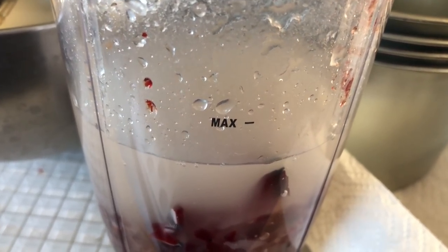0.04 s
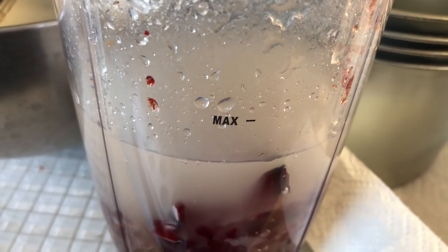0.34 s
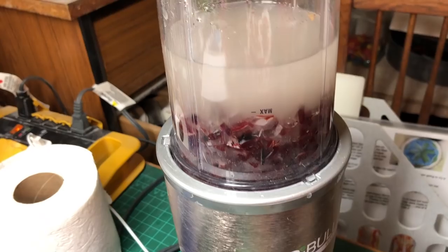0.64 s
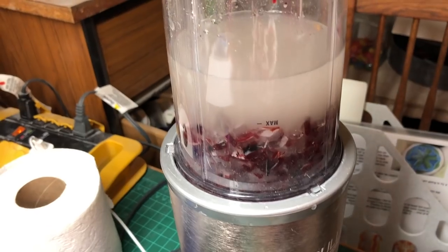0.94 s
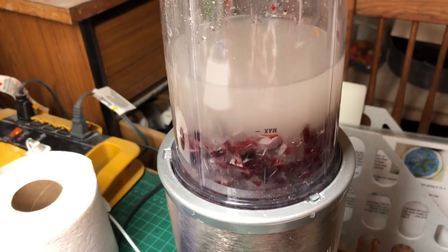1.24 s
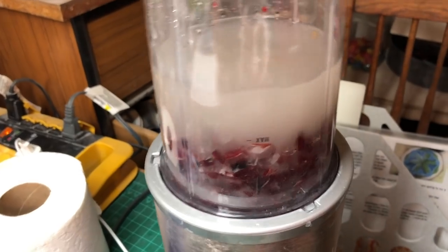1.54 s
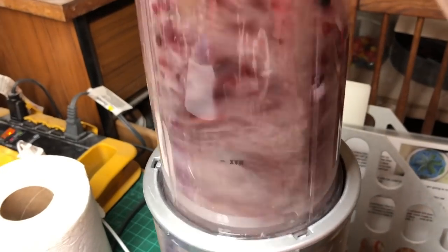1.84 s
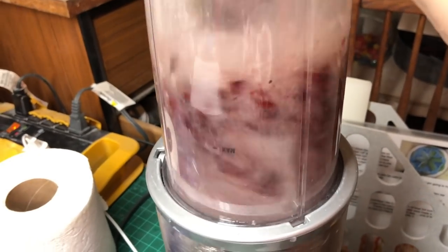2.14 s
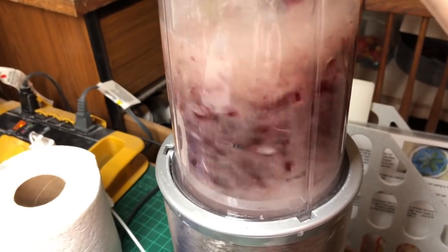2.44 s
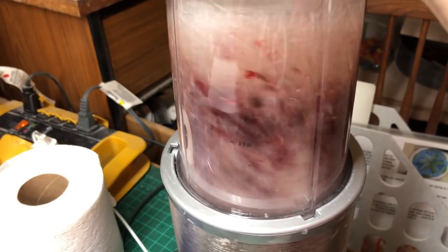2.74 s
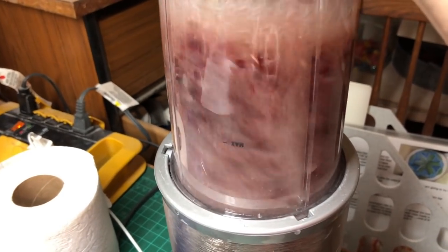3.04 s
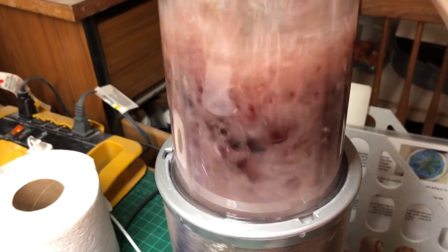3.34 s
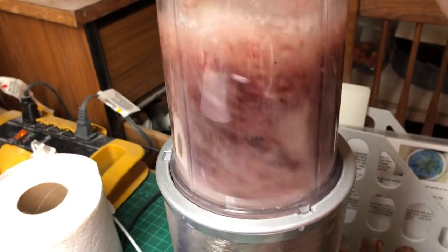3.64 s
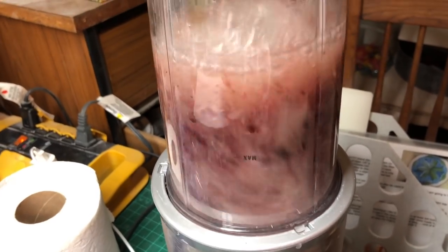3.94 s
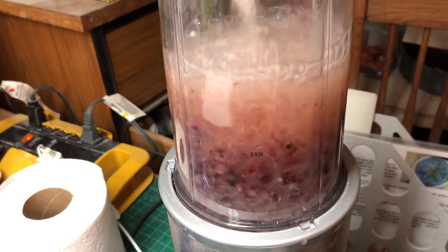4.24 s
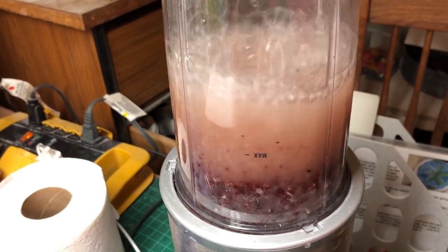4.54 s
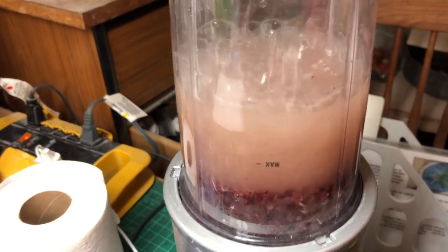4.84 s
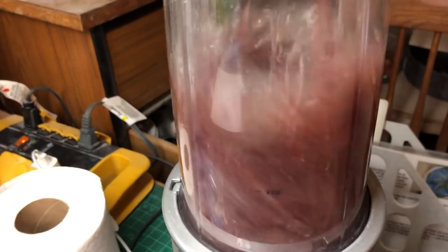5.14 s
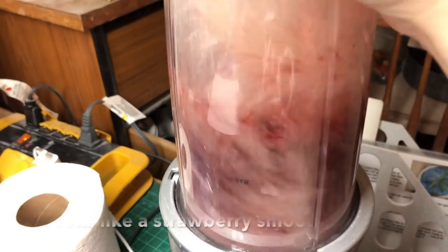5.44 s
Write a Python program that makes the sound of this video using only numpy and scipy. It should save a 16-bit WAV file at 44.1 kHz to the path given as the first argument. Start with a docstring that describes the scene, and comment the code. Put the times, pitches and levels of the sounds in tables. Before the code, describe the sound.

At first there is only a faint hum and soft ventilation in a kitchen. Around 1.5 seconds a plastic cup scrapes and clacks into its blender base, close to the microphone. At about 1.6 seconds the blender starts, the blades labouring through thrashing water and broken glass. From about 1.9 seconds the motor races, and shards batter the plastic wall in a loud, gritty crackle with sharp cracks and a few soft, low gulps of air. The motor pitch sags briefly twice. At about 3.6 seconds it is let go and coasts down with a few last knocks, stopping near 4.4 seconds as foam faintly fizzes away. The cup clacks again just before 5 seconds, and a second burst begins right after, churning and then racing with more crunching glass, still running at the end, a little past 5.5 seconds.

```python
"""Blender grinding glass

Close up on a kitchen table, a cup blender is clacked onto its switch and grinds broken glass in water.
In each of two bursts the blades labour in the slurry, then a vortex opens: the motor races and shards
batter the plastic wall. Between bursts it coasts down with a few last knocks and the foam settles.
The room hums faintly, and a gain control ducks the loud parts and recovers slowly."""
import sys
import numpy as np
from scipy import signal
from scipy.fft import rfft, irfft
from scipy.io import wavfile
from scipy.ndimage import uniform_filter1d

SR = 44100
rng = np.random.default_rng(int(sys.argv[2]) if len(sys.argv) > 2 else 0)


def to_wav(s):
    """Save 16-bit WAV."""
    ch = np.atleast_2d(s).T  # columns
    pcm = np.round(np.clip(ch, -1, 1) * 32767)  # PCM
    wavfile.write(sys.argv[1], SR, pcm.astype(np.int16))


N = 250488
TIME = np.arange(N) / SR
DUCK_DB = 8.5  # deepest cut of the gain control
COAST_S, STOP_S = 0.75, 0.11  # blades let go: time to rest, final fade

# the biggest shards hit by the blades: time_s, level_db, brightness, decay_s
BIG_SHARDS = [(1.646, -12, 7, 0.0046), (1.694, -10, 1, 0.0025), (1.865, -11.5, 15, 0.0034),
              (1.901, -4, 23, 0.00088), (1.9384, -12.5, -31, 0.006), (2.273, -5.5, -5, 0.0026),
              (2.302, -22, -2, 0.0032), (2.35, -10.5, 2, 0.0054), (2.407, -14.5, 5, 0.008),
              (2.604, -15.5, 0, 0.0089), (2.7906, -8, 1, 0.0036), (2.815, -12.5, -14, 0.0068),
              (2.878, -5.5, -15, 0.0031), (3.1544, -16, 19, 0.0061), (3.2017, -5, -13, 0.0028),
              (3.236, -6, -22, 0.0023), (3.368, -9, -23, 0.0018), (3.5655, -8.5, -10, 0.0035),
              (3.759, -9.5, -7, 0.0044), (3.823, -16, -14, .002), (3.847, -15, -28, 0.0025),
              (3.877, -15.5, -22, 0.005), (3.9496, -13, -6, 0.0026), (4.0088, -20, -18, 0.0044),
              (4.054, -21, -2, 0.01), (4.0874, -21, 3, 0.0097), (4.1072, -15.5, 1, 0.0033),
              (4.223, -20.5, -20, 0.0045), (4.254, -26, -11, 0.0092), (4.319, -30.5, -1, 0.011),
              (5.0625, -13, -5, 0.0043), (5.0764, -20, 16, .01), (5.292, -11.5, -22, 0.0038),
              (5.3526, -4.5, -39, 0.0018), (5.411, -9, -12, 0.0032), (5.53, -9, -18, 0.0056),
              (5.5664, -15, -12, 0.003), (5.612, -12.5, -17, 0.0071), (5.656, -5, 19, 0.0011)]
# the vortex gulps air: time_s, thump_db
AIR_GULPS = [(1.913, -44.5), (2.375, -43), (2.579, -49), (2.903, -43), (3.088, -50), (3.438, -48),
             (5.218, -43)]
# bursts of the motor: on_s, vortex_opens_s, let_go_s, free_speed_hz, flooded_thrash_db
BURSTS = [(1.646, 1.842, 3.626, 250.4, -25), (5.065, 5.242, 6, 254.2, -22)]


def undb(db):
    """Decibels to gain."""
    return np.exp(np.asarray(db) * np.log(10) / 20)


def unit(x):
    """Scale to rms 1."""
    return x / np.sqrt(np.mean(x ** 2))


def even(x, size=3500):
    """Hold the slow level at 1 and keep the fast bursts."""
    return x / np.sqrt(uniform_filter1d(x ** 2, size) + 1e-9)


def ramp(x, span):
    """Rise from 0 to 1 as x goes from 0 to span."""
    return np.clip(x / span, 0, 1)


def bump(at_s, length_s):
    """A smooth swell of height 1."""
    return np.exp(-((TIME - at_s) / length_s) ** 2)


def walk(rate_hz, size=4096):
    """Random drift with a spread near 1."""
    return 1.5 * np.interp(TIME * rate_hz, np.arange(size), rng.standard_normal(size))


def grains(spread_db):
    """Dense tiny clicks: plain hiss at zero spread, grittier as it grows."""
    sizes = np.minimum(rng.exponential(size=N), 5)
    return unit(rng.standard_normal(N) * undb(spread_db * sizes))


def colour(x, points, size=4096):
    """Minimum-phase EQ of unit energy; the (freq_hz, gain_db) points set only its shape."""
    hz, db = np.transpose(points)
    grid = np.maximum(np.fft.rfftfreq(size, 1 / SR), 1)
    cepstrum = irfft(np.log(undb(np.interp(np.log(grid), np.log(hz), db))))
    cepstrum[1:size // 2] *= 2
    cepstrum[size // 2 + 1:] = 0
    response = irfft(np.exp(rfft(cepstrum)))
    return signal.oaconvolve(x, response / np.linalg.norm(response))[:N]


def resonance(x, hz, width_hz):
    """One damped mode, gain 1 at its centre."""
    return signal.lfilter(*signal.iirpeak(hz, width_hz, fs=SR), x)


def room_tone():
    """Soft ventilation and a beating hum; the bed drops out for an instant and returns a little duller."""
    # ventilation EQ: freq_hz, gain_db
    air_eq = [(20, -25.5), (60, -11.5), (115, 3.5), (170, -7), (260, -9.5), (420, -15), (1200, -14.5),
              (1700, -23.5), (4000, -35), (16000, -44)]
    # steady hum tones: pitch_hz, level_db
    hum_tones = [(118.4, -62.5), (140, -69), (258.4, -74), (839.8, -72.5)]
    early_eq = [(25, -17), (65, 7), (150, 2), (600, -0.5), (1200, -6.5), (2500, -16), (5000, -23.5),
                (16000, -53)]
    air = colour(rng.standard_normal(N), air_eq) * undb(-61.5 + 0.59 * walk(11))
    early_air = colour(rng.standard_normal(N), early_eq)
    hum = sum(np.sqrt(2) * undb(db + .6 * walk(5)) * np.sin(2 * np.pi * hz * TIME + .15 * walk(6.7))
              for hz, db in hum_tones)
    opening = undb(-3) * air + undb(-2) * hum + undb(-63.5) * early_air
    return (TIME < .65) * opening + (TIME > .692) * (air + hum)


def kitchen(x, t60_s=0.72, wet_db=-18, size=26000):
    """Walls and table add a short, duller tail."""
    t = np.arange(size) / SR
    tail = rng.standard_normal(size) * np.exp(-np.log(1000) * t / t60_s) * (t > .004)
    tail = signal.lfilter(*signal.butter(1, 7000, fs=SR), tail / np.linalg.norm(tail))
    return x + undb(wet_db) * signal.fftconvolve(x, tail)[:N]


# bright crack of a hard contact, glass or plastic: freq_hz, gain_db
CRACK_EQ = [(150, -40.5), (400, -13), (800, -11), (1300, -1.5), (2600, 6), (3600, 4.5), (5000, 2.5),
            (6000, -1), (8000, 2.5), (12000, -7.5), (15500, -1.5)]


def handling():
    """The cup is pressed and let go: soft contacts knock dully, hard ones crack, and the wall rings."""
    # the cup slides against its seat: peak_s, level_db, rise_and_fall_s
    scrapes = [(1.44, -70.5, .05), (1.497, -47.5, 0.02), (1.645, -49, 0.023), (4.98, -49.5, 0.03),
               (5.06, -50, 0.028)]
    # the cup clacks in its base: start_s, level_db, hardness (0-1), decay_s, wall_ring_db
    clacks = [(1.429, -38, 0.05, .0046, -20), (1.482, -39, 0.68, .003, -14.5),
              (1.501, -24.5, 0.7, .002, -13), (1.511, -43, .8, .002, -3), (1.521, -39, .9, .002, 6),
              (1.64, -34, 1, .0082, 18), (4.63, -56, .16, .01, -18), (4.904, -44.5, 0.14, .0046, -6),
              (4.977, -27.5, 0.68, 0.0042, 16)]
    # dull knock of the plastic base: freq_hz, gain_db
    knock_eq = [(100, -27), (300, 0), (500, 8.5), (800, -3), (1400, 2), (2300, 4), (3500, -34),
                (8000, -34.5), (16000, -42.5)]
    sliding = sum(undb(db) * np.exp(-np.abs(TIME - s) / slope_s) for s, db, slope_s in scrapes)
    scrape = grains(spread_db=0) * sliding
    soft, hard, wall = undb(-2) * scrape, undb(0.5) * scrape, undb(-5) * scrape
    for s, db, hardness, decay_s, ring_db in clacks:
        clack = undb(db) * (TIME >= s) * np.exp(-np.abs(TIME - s) / decay_s) * rng.standard_normal(N)
        soft += np.sqrt(1 - hardness) * clack
        hard += np.sqrt(hardness) * clack
        wall += undb(ring_db) * clack
    ring = resonance(wall, 2860, 110) + undb(-4) * resonance(wall, 484, 120)
    return colour(soft, knock_eq) + undb(-7) * colour(hard, CRACK_EQ) + undb(11) * ring


def foam(level_db=-49, fade_db_per_s=-100):
    """Bubbles fizz and die away as the blades come to rest after the first burst."""
    # fizz in the cup: freq_hz, gain_db
    fizz_eq = [(88, -52), (150, -24), (286, -36), (315, -3.5), (466, -0.5), (837, -20), (1170, -9),
               (2140, -10), (16000, -33)]
    age = TIME - (BURSTS[0][2] + COAST_S)
    envelope = ramp(age + STOP_S, STOP_S) * undb(level_db + fade_db_per_s * np.maximum(age, 0))
    return colour(grains(spread_db=4.5), fizz_eq) * envelope


def gulps(work, flood, top_hz=130, low_hz=45, thump_s=.012):
    """Big air pockets collapse in the open vortex with a soft falling thump, over a faint rumble."""
    thumps = np.zeros(N)
    for s, db in AIR_GULPS:
        near = np.abs(TIME - s) < .06
        age = (TIME[near] - s) / thump_s
        hz = low_hz + (top_hz - low_hz) * (1 - np.tanh(age)) / 2
        thumps[near] += undb(db) * np.exp(-age ** 2 / 2) * np.sin(2 * np.pi * np.cumsum(hz) / SR)
    rumble = colour(rng.standard_normal(N), [(15, -1.5), (60, -10), (130, 1), (300, -25.5), (2000, -75)])
    return thumps + undb(-54.5 + 3 * walk(24)) * rumble * work * (1 - flood) ** 2


def churning(blows, stir):
    """Water thrashes against the cup, jolted by the blows on the glass."""
    # body of the churning water: freq_hz, gain_db
    water_eq = [(80, -39), (170, -16.5), (300, -8), (420, 0), (490, 1.5), (600, -4), (800, -8),
                (1200, -3.5), (1700, -5.5), (3000, -10.5), (8000, -35)]
    turbulence = grains(spread_db=3) * undb(3 * walk(70))
    return colour(undb(-1) * turbulence + undb(-5.5) * blows, water_eq) * stir


def motor(shaft_hz, shake):
    """Unbalance sounds once a turn, the blades twice; glass jogs the speed."""
    phase = 2 * np.pi * np.cumsum(shaft_hz * (1 + 0.021 * walk(60))) / SR
    tone = undb(0.5) * np.sin(phase) + undb(-9 + 3.5 * walk(30)) * np.sin(2 * phase)
    return np.sqrt(2) * tone * undb(1.07 * walk(40)) * shake


def blades(labour_hz=130, full_force_hz=181, spin_up_s=.19, slowing_s=.37, drain_s=.11, refill_s=.71):
    """Control curves: the blades labour under water, open a vortex, race, and coast when let go."""
    # slurry slumps onto the blades and drags the motor down: time_s, half_length_s, speed_lost_hz
    slumps = [(2.222, .11, 50), (2.921, 0.14, 49), (3.471, .03, 9.7), (5.508, 0.11, 11.8)]
    # the base passes the shaft tone best at full speed: shaft_hz, gain_db
    mount = [(70, -83), (115, -65.5), (175, -52), (215, -53), (238, -47.5), (247, -40.5), (260, -35.5)]
    bursts = np.array(BURSTS)
    current = np.maximum(np.searchsorted(bursts[:, 0], TIME) - 1, 0)
    on, opens, off, free_hz, thrash_db = bursts[current].T
    drag_hz = sum(lost_hz / (1 + ((TIME - s) / half_s) ** 2) for s, half_s, lost_hz in slumps)
    spin = np.sin(np.pi / 2 * ramp(TIME - opens, spin_up_s))
    slowing = np.exp(-np.maximum(TIME - off, 0) / slowing_s)
    shaft_hz = (labour_hz + (free_hz - drag_hz - labour_hz) * spin) * slowing
    turning = ramp(TIME - on, 0.0063) * ramp(off + COAST_S - TIME, STOP_S)

    settling = ramp(TIME - off, refill_s)  # coasting, water returns and the glass sinks away
    covered = (1 - .73 * ramp(TIME - on, opens - on)) * (1 - ramp(TIME - opens, drain_s))
    flood = np.clip(covered + .6 * settling, .03, .97)  # share of the blades under water
    packing = .7 + .3 * bump(on, .6) - .45 * settling  # the tight heap loosens as it is stirred

    flung_db = -3.5 * bump(opens + .065, .06)  # the vortex flings the glass clear
    fallback_db = 2 * bump(opens + .2, .052)  # it lands back on the racing blades
    starved_db = -2 * sum(bump(s, .015) for s, _ in AIR_GULPS)  # each gulp leaves nothing to hit
    weakening = np.where(TIME > off, np.minimum(shaft_hz / full_force_hz, 1), 1)
    force = turning * undb(flung_db + starved_db + fallback_db) * weakening
    work = force * undb(-20.5)  # drive on the glass
    # the cracks dull for a while late in the first burst, and soften as the blades slow
    crisp = undb(-2.5 * bump(3.32, .19) - 5.5 * ramp(labour_hz - shaft_hz, labour_hz))

    opened = ramp(TIME - opens, .02)
    heave_db = 2.5 * bump(opens - .02, .025)  # the water heaves just before the vortex opens
    swirl_db = -30.5 - 2 * (np.minimum(TIME, off) - opens)  # softer as it froths
    stir = force * undb((1 - opened) * (thrash_db + heave_db) + opened * swirl_db)

    surge = undb(-34) * bump(opens + .1, .053)  # the forming vortex loads the shaft unevenly
    shake = turning * (undb(np.interp(shaft_hz, *np.transpose(mount))) + surge)
    return shaft_hz, flood, packing, work, crisp, stir, shake


def cup(x, wander_db=1.1, size=2048):
    """The plastic cup rings in its damped modes; their shares wander with the place that is hit."""
    # modes of the cup: pitch_hz, width_hz, level_db
    wall_modes = [(500, 46, -13), (1556, 96, -13.5), (2261, 183, 3.5), (2490, 230, 2.5), (2823, 174, 6),
                  (3000, 152, 4), (3540, 14, -11.5), (4440, 160, -8.5)]
    # the highest mode sings out while shards skim the wall: time_s, length_s, boost_db
    skims = [(2.035, 0.08, 10.5), (3.49, 0.083, 13.5), (5.433, 0.033, 8)]
    t = np.arange(size) / SR
    modes = [(-1) ** k * undb(db) * width * np.exp(-np.pi * width * t) * np.sin(2 * np.pi * hz * t)
             for k, (hz, width, db) in enumerate(wall_modes)]
    rings = [signal.oaconvolve(x, mode)[:N] * undb(wander_db * walk(14)) for mode in modes]
    skim_db = sum(boost_db * bump(s, length_s) for s, length_s, boost_db in skims)
    return (sum(rings[:-1]) + undb(skim_db) * rings[-1]) / np.linalg.norm(sum(modes))


def crunches(times, gains, decays_s, tilts_db, patchy_db, rise_s, size=1024, bands=24):
    """Each fracture is a short noise burst with its own tilt per octave and its own ringing bands."""
    t, hz = np.arange(size) / SR, np.fft.rfftfreq(size, 1 / SR)
    draws = rng.standard_normal((len(times), size + bands))
    envelopes = (1 - np.exp(-t / rise_s)) * np.exp(-(t / np.maximum(decays_s, .0003)[:, None]) ** 1.2)
    octaves = np.log2(np.maximum(hz, 1500) / 3000)
    out = np.zeros(N + 2 * size)
    for s, gain, tilt_db, envelope, noise in zip(times, gains, tilts_db, envelopes, draws):
        patches = np.interp(np.sqrt(hz / hz[-1]), np.linspace(0, 1, bands), noise[size:])
        burst = irfft(rfft(noise[:size]) * undb(tilt_db * octaves + patchy_db * patches))
        start = int(np.clip(s * SR, 0, N))
        out[start:start + size] += gain * envelope * burst
    return out[:N]


def splinters(per_s=70, snap_s=0.00043, size=64):
    """Splinters snap off with lone, very short bright ticks over a hiss of spray."""
    ticks = rng.random(N) < per_s / SR
    envelope = np.convolve(ticks, np.exp(-np.arange(size) / SR / snap_s))[:N]
    spray = (unit(envelope) + undb(-6.5)) * rng.standard_normal(N)
    return colour(spray, [(1000, -25.5), (4000, 1.5), (8000, 1), (12000, -5), (15500, -5.5)])


def crumbs(count=1100):
    """Small bits of glass pepper the blades at random, in a steady crackle."""
    times = rng.random(count) * N / SR
    size, length, tilt = rng.standard_normal((count, 3)).T
    gains = undb(2.6 * np.minimum(size, 1.6))
    decays_s = 0.0017 * np.exp(.5 * length)
    return even(crunches(times, gains, decays_s, 2.1 * tilt, patchy_db=-1.5, rise_s=0.00016))


def chips(per_s=24, count=160):
    """Middling shards meet the blades at loosely even intervals."""
    size, length, tilt = rng.standard_normal((count, 3)).T
    times = (np.arange(count) + rng.random(count)) / per_s
    decays_s = 0.002 * np.exp(.35 * length)
    return crunches(times, undb(5 + 3.5 * size), decays_s, 0.87 * tilt - 1.35, patchy_db=.6, rise_s=.0016)


def big_shards(jam_s=.009, jam_db=-3.2):
    """A big shard holds the small glass off the blades, then cracks through: the cracks and that dip."""
    times, db, brightness, decays_s = np.transpose(BIG_SHARDS)
    cracks = crunches(times, undb(db), decays_s, 0.23 * (brightness + 5), patchy_db=1.5, rise_s=.0013)
    return cracks, undb(jam_db * sum(bump(s - jam_s / 2, jam_s) for s in times))


def grinding(blows, work, flood, packing, crisp):
    """Glass cracks on the blades and knocks on the cup; packed grit rasps, and water damps the wall."""
    # glass heard through the slurry: freq_hz, gain_db
    slurry_eq = [(59, -56.5), (100, -24), (295, -17.5), (461, 0.5), (583, -22), (705, -5.5), (910, -8.5),
                 (1100, -2), (2000, -3), (2580, 0), (3320, -7), (4980, -4.5), (11600, -20), (15000, -17),
                 (16000, -26)]
    grit = grains(spread_db=0.5) * undb(2.96 * walk(160)) * undb(-10.5 + 6.44 * packing)
    small_glass = undb(-5.5) * blows + grit + chips() * (1 - .75 * flood) * crisp
    cracks, jam_dip = big_shards()
    glass = small_glass * work * jam_dip + cracks
    in_air = undb(-2) * colour(glass, CRACK_EQ) * crisp + undb(-1) * cup(glass) * (1 - flood / 2)
    submerged = undb(2) * colour(glass, slurry_eq)
    sparkle = undb(-10) * splinters() * crisp * work * (1 - flood / 4)
    return np.sqrt(1 - flood) * in_air + np.sqrt(flood) * submerged + sparkle


def scene():
    """The blender and its handling in the kitchen, over the room tone; mono."""
    shaft_hz, flood, packing, work, crisp, stir, shake = blades()
    blows = crumbs()
    glass = grinding(blows, work, flood, packing, crisp)
    blender = glass + churning(blows, stir) + motor(shaft_hz, shake) + gulps(work, flood) + foam()
    blender *= undb(DUCK_DB)  # driven hot into the gain control
    return (kitchen(blender + handling()) + room_tone())[None]


def record(dry, threshold_db=-26, release_s=2.5, bass_hz=30, top_hz=15900):
    """The mic thins deep bass; gain control ducks fast, recovers slowly; peaks round off, the top is cut."""
    heard = signal.lfilter(*signal.butter(2, bass_hz, "high", fs=SR), dry)
    loudness = np.sqrt(np.abs(uniform_filter1d(heard[0] ** 2, size=128)) + 1e-12)
    release = np.exp(-TIME / release_s)
    held = np.maximum.accumulate(loudness / release) * release
    gain = np.clip(undb(threshold_db) / held, undb(-DUCK_DB), 1)
    rounded = .6 * np.tanh(heard * gain / .6)
    return signal.sosfilt(signal.ellip(10, .2, 70, top_hz, fs=SR, output="sos"), rounded)


dry = scene()
out = record(dry)
to_wav(out)
```